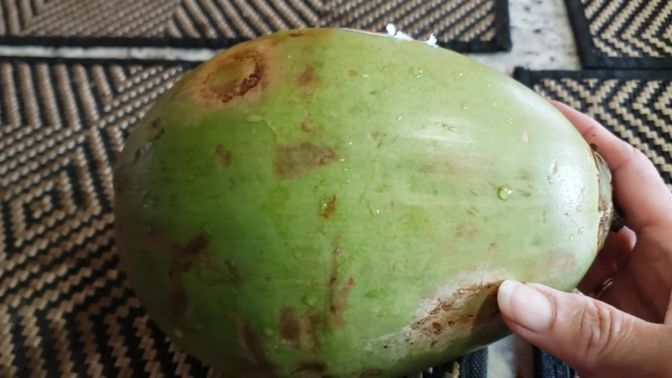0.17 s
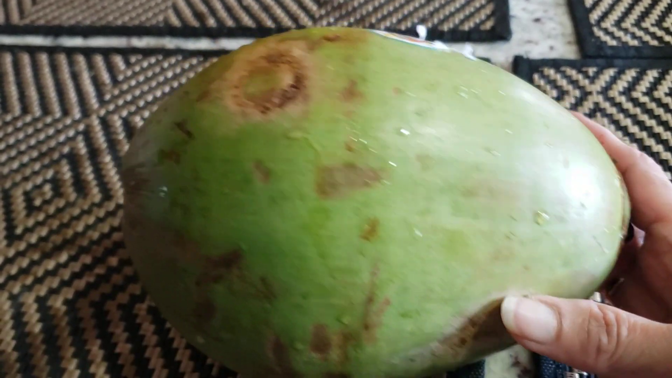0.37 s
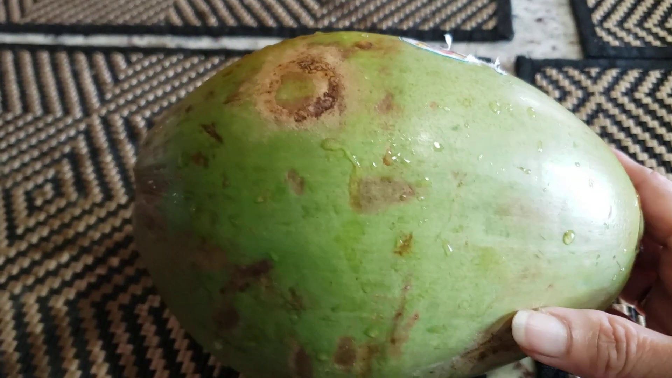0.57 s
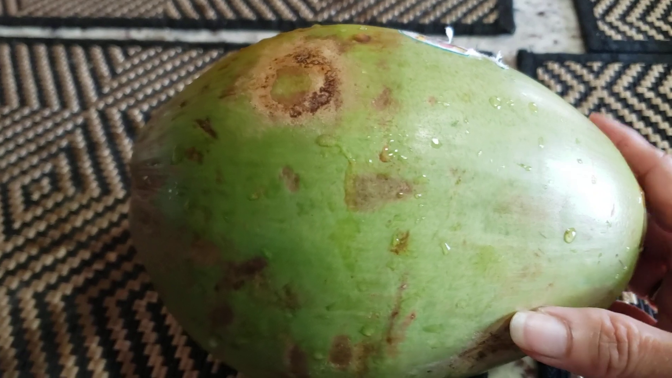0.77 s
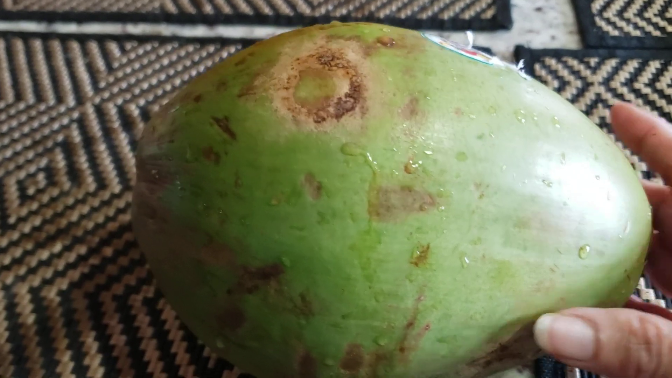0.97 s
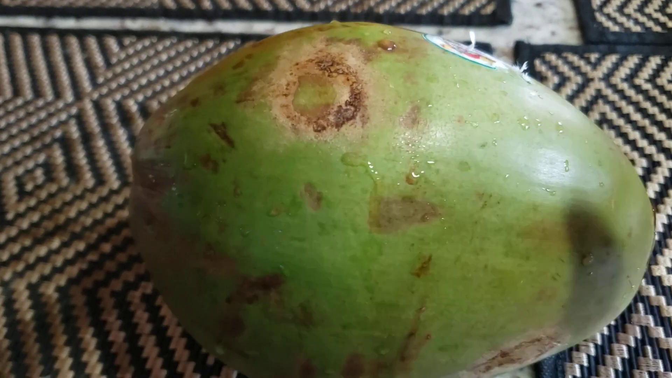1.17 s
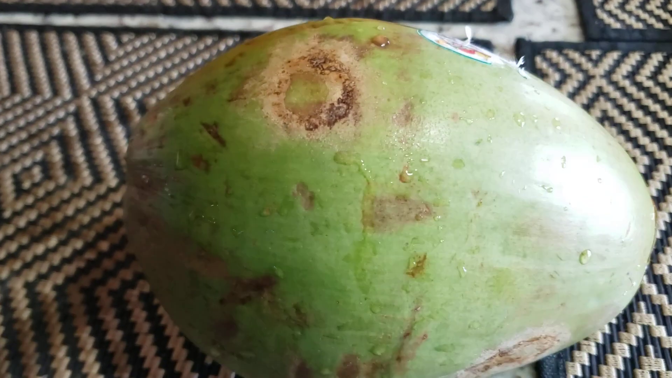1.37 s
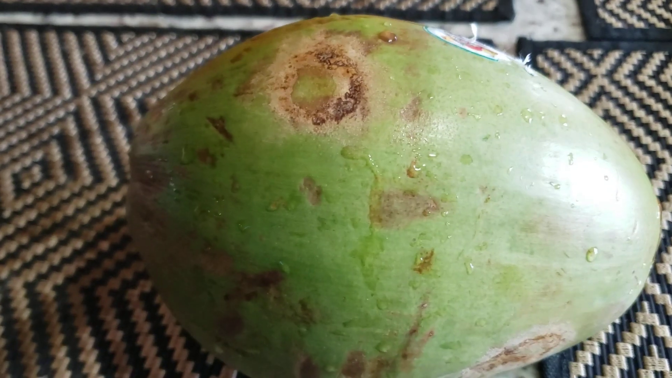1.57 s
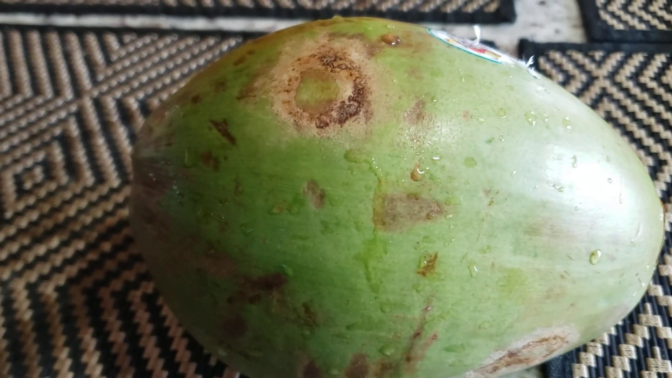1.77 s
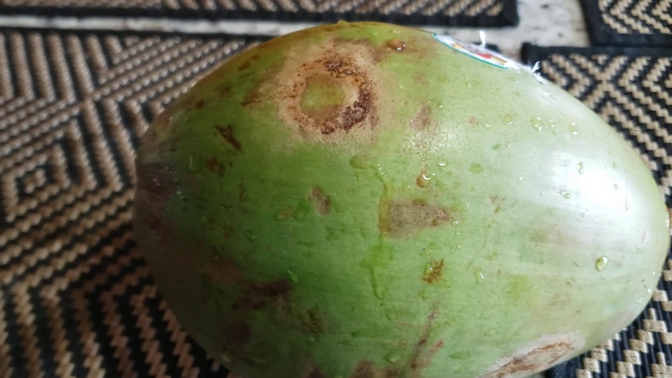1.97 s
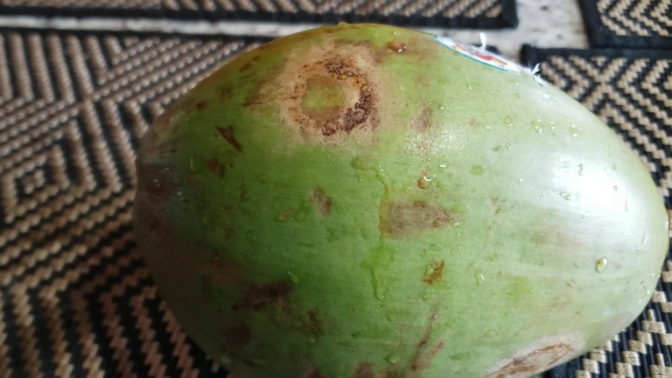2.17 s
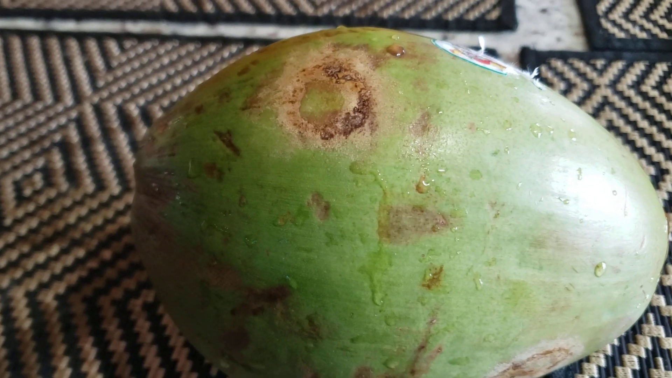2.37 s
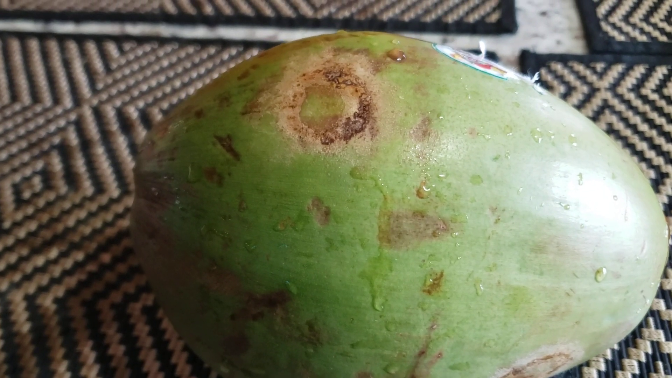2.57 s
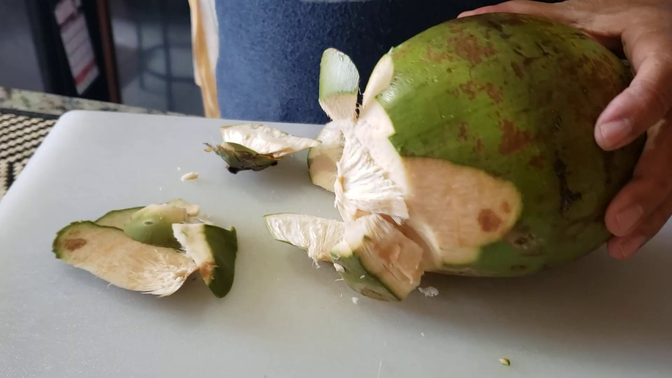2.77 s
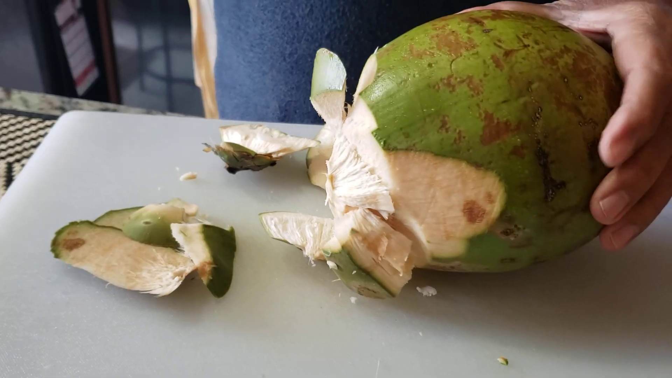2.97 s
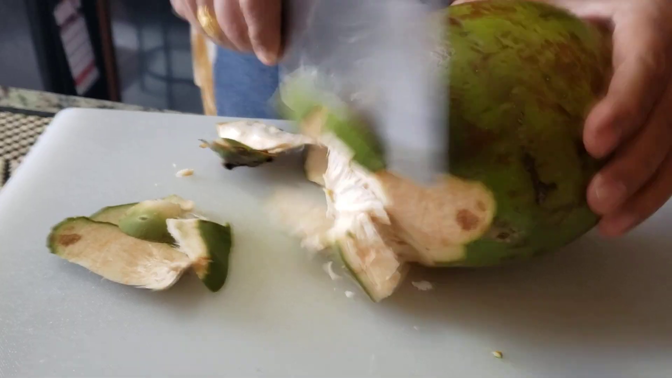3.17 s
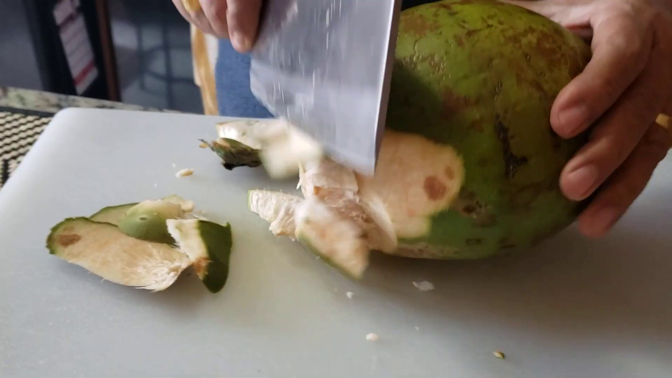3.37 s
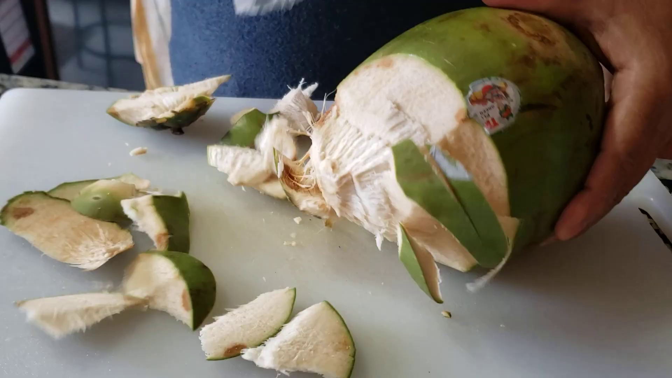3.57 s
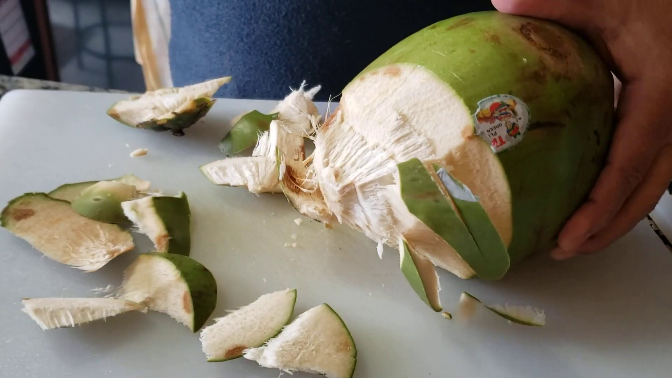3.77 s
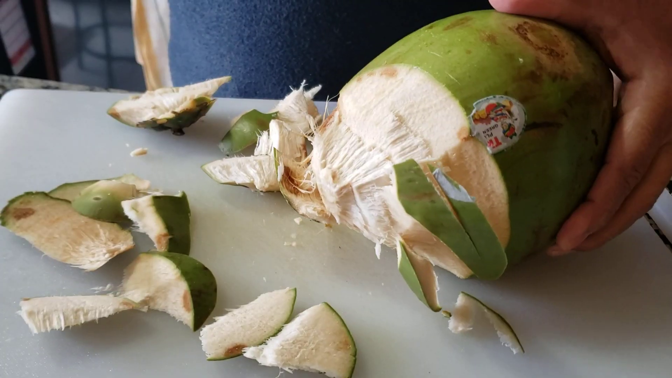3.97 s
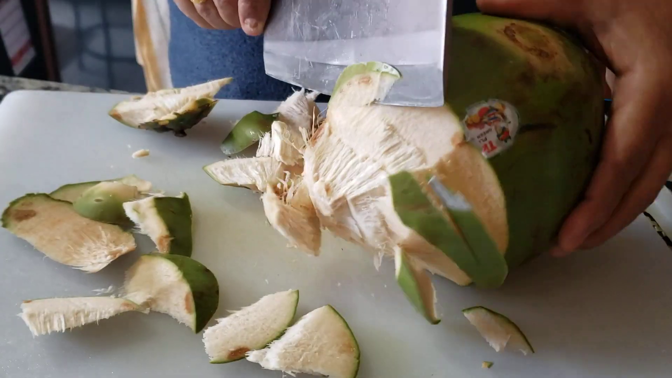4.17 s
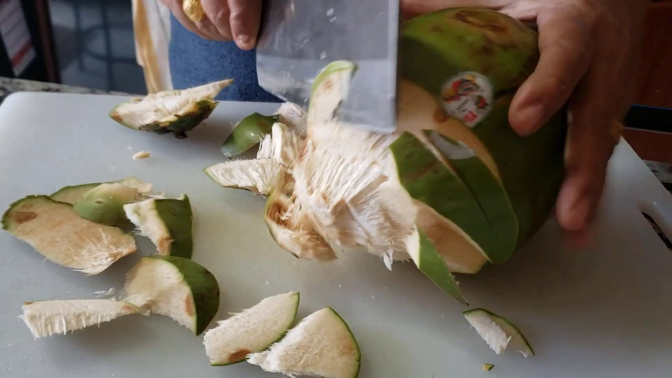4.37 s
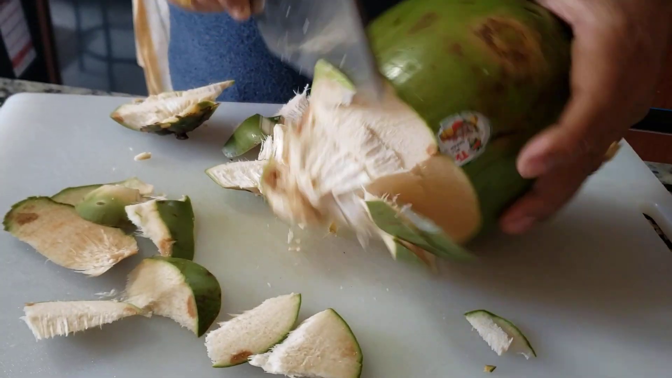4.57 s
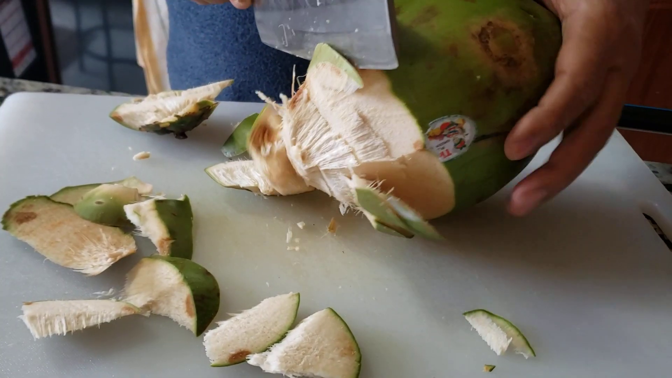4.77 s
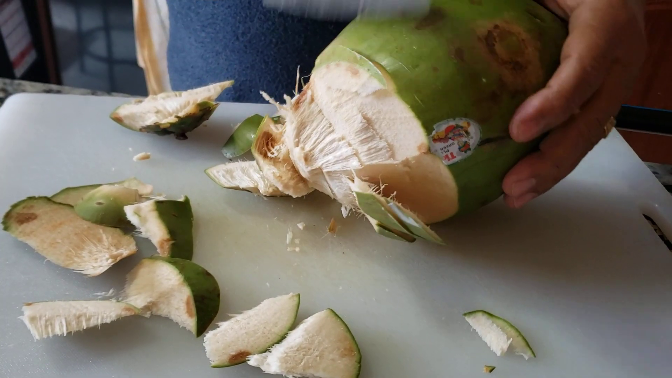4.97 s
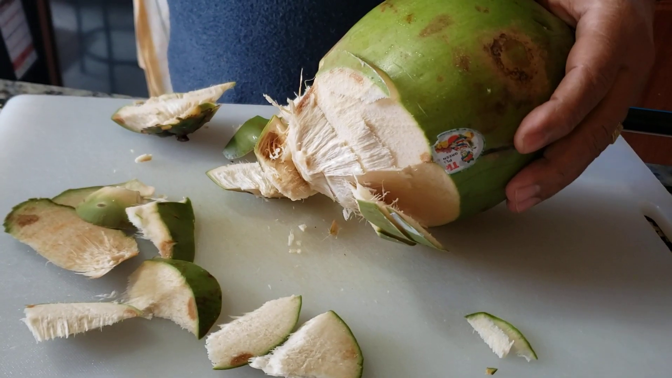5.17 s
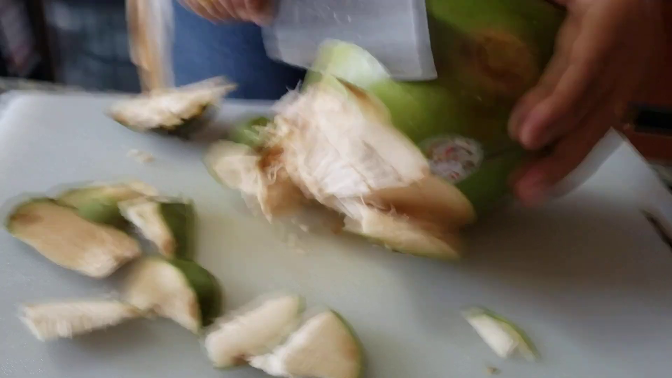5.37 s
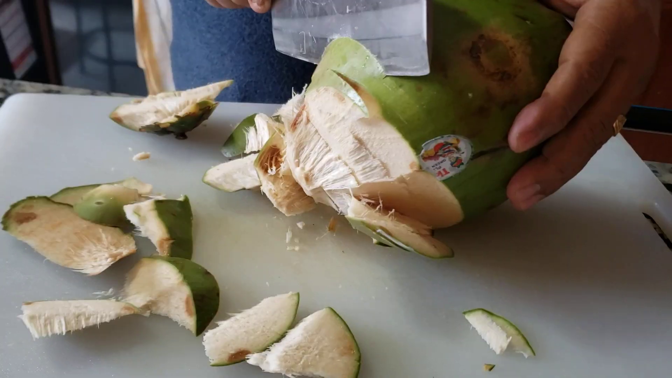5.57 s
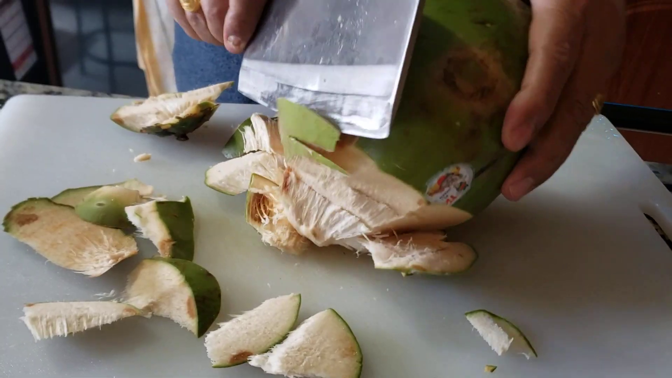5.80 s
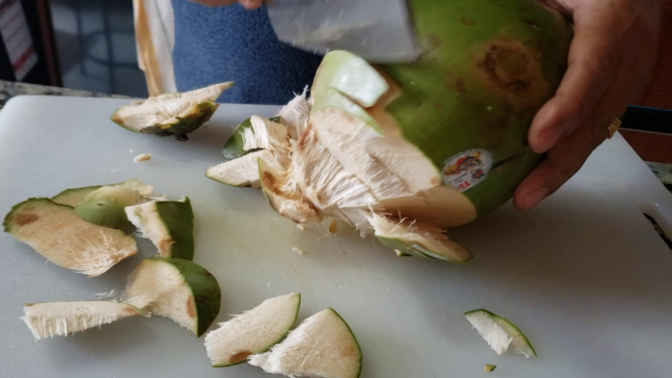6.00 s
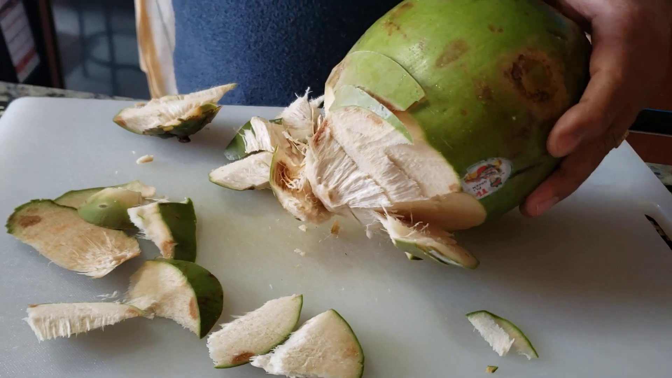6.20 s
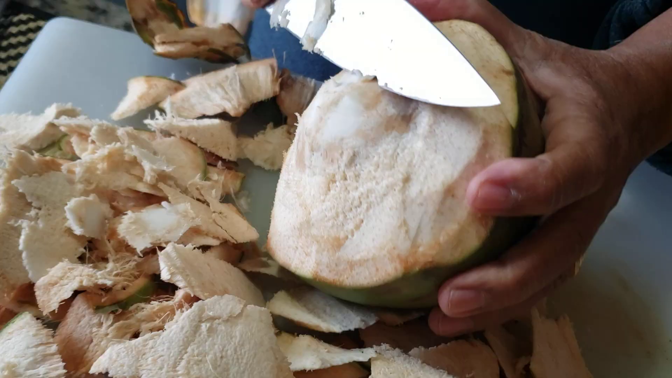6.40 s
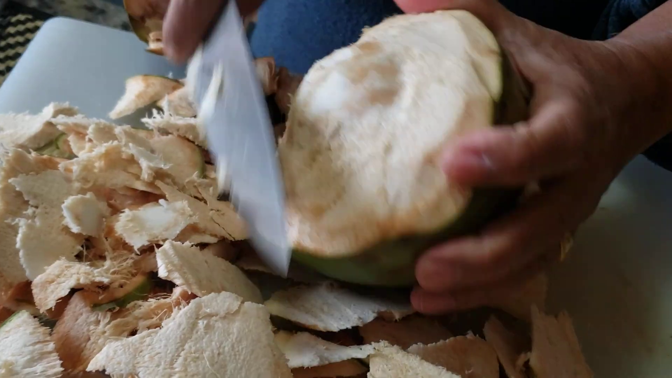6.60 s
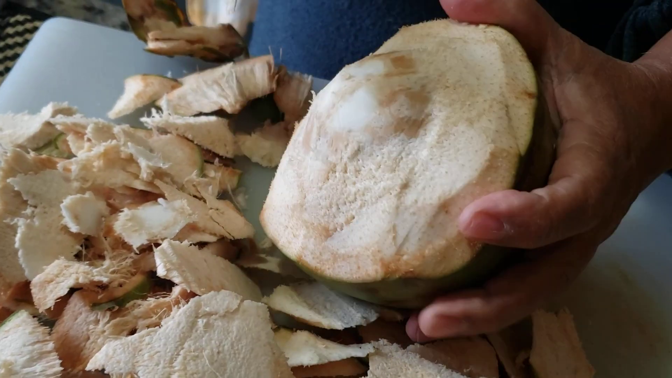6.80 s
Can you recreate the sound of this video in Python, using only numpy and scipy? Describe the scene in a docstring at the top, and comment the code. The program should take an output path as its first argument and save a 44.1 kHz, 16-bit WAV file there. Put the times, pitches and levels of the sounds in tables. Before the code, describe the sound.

Over an appliance's steady rush and faint whine, three cleaver blows crack into coconut husk, the blade scraping and tearing fibres in between.

```python
"""An appliance rushes, hums and whines in a small kitchen, heard first from near it, then beside a board.
There a cleaver chops three times into the husk of a green coconut: splitting fibres crack, blade and
nut ring, and the force passes through the plastic board to boom in the counter.
Between blows the blade rasps as it is worked free, husk tears and wet fingers tick off the skin."""
import sys
import numpy as np
from scipy import signal
from scipy.io import wavfile
from scipy.ndimage import uniform_filter1d

SR = 44100
rng = np.random.default_rng(int(sys.argv[2]) if len(sys.argv) > 2 else 0)


def int16_out(signal):
    """Quantize to a 16-bit WAV file."""
    q = np.round(np.clip(np.atleast_2d(signal).T, -1, 1) * 32767)
    wavfile.write(sys.argv[1], SR, q.astype(np.int16))


N = 301644


def amp(db):
    """Amplitude ratio of a level in dB."""
    return 10 ** (np.asarray(db) / 20)

def unit_rms(x):
    """Normalisation to a mean power of 1."""
    return x / np.sqrt(np.mean(x ** 2) + 1e-20)

def curve_at(points, hz):
    """Interpolation on a log-frequency axis."""
    freqs, values = np.transpose(points)
    return np.interp(np.log(hz + 1), np.log(freqs + 1), values)

def add(mix, start_s, sound):
    """Superposition of a sound on the mix."""
    part = mix[..., round(start_s * SR):][..., :sound.shape[-1]]
    part += sound[..., :part.shape[-1]]

def coloured(x, spectrum):
    """Minimum-phase filtering by (Hz, dB) points, with an impulse response of unit energy."""
    hz = abs(np.fft.fftfreq(4096, 1 / SR))
    log_gain = np.log(amp(np.maximum(curve_at(spectrum, hz), -100)))
    taps = np.fft.ifft(np.exp(np.conj(signal.hilbert(log_gain)))).real[:2048]
    return signal.oaconvolve(x, taps / np.linalg.norm(taps))[:len(x)]

def crackle(count, spread_db):
    """Heavy-tailed noise: samples of widely differing size are heard as crackle."""
    return unit_rms(rng.standard_normal(count) * amp(spread_db * np.minimum(rng.exponential(1, count), 5)))

def flutter(depth_db, span):
    """Random amplitude modulation, smoothed over a span of samples."""
    return amp(depth_db * unit_rms(uniform_filter1d(rng.standard_normal(N), span)))

def ring(hz, db, t60, t):
    """A damped oscillator, falling 60 dB in t60 seconds."""
    return amp(db - 60 * t / t60) * np.sin(2 * np.pi * hz * t)

def modal_sum(modes, t):
    """The impulse response of a body is the sum of its modes."""
    return sum(weight * ring(hz, db, t60, t) for hz, db, t60, weight in modes)


# Air noise near the appliance, at the board, and its hiss. Each row: frequency in Hz, density in dB.
NEAR_SPECTRUM = [(12, -55), (20, -36), (62, -0.5), (192, -4), (237, -3.5), (269, -6), (409, -4),
                 (505, -14.5), (597, -7), (649, -16), (871, -17), (1380, -15.5), (3000, -25), (3900, -66),
                 (6600, -120)]
BOARD_SPECTRUM = [(12, -70), (20, -41.5), (71, 5.5), (119, -18), (151, 0.5), (249, -3.5), (277, -12.5),
                  (309, -1), (438, -14.5), (593, -18), (661, -18), (858, -14.5), (1480, -21), (2710, -19.5),
                  (3600, -36.5), (4680, -117), (7920, -120)]
HISS_SPECTRUM = [(1760, -22), (3000, -28.5), (3290, -1), (4080, -1), (4840, 0), (5780, -6.5), (7270, -4.5),
                 (8090, -12), (9190, -32.5), (11800, -18), (15000, -21.5), (16000, -24.5), (16500, -37.5)]
# Balance at each position. Each row: frequency in Hz, left over right in dB.
NEAR_BALANCE = [(60, 2.0), (130, -1), (290, 0.5), (640, -4), (1410, 1.0), (3100, 2.0), (6820, 0),
                (15000, -1)]
BOARD_BALANCE = [(60, 0.0), (130, -0.5), (290, -0.5), (640, -0.5), (1410, 2.5), (3100, 8.5), (6820, -5),
                 (15000, -1.0)]
# Likeness of the two channels. Each row: frequency in Hz, correlation coefficient.
AIR_COHERENCE = [(60, 0.9), (180, 0.96), (550, 0.71), (1650, -0.2), (4970, -0.039), (15000, 0.5)]

def appliance_air(at_board):
    """A partly coherent noise field: left and right share a fraction of each random spectrum."""
    frames, hz = N // 256 + 5, np.fft.rfftfreq(1024, 1 / SR)
    draws = rng.standard_normal((frames, 513, 5)).T
    left, independent = draws[0] + 1j * draws[1], draws[2] + 1j * draws[3]
    coherence = curve_at(AIR_COHERENCE, hz)[:, None]
    right = coherence * left + np.sqrt(1 - coherence ** 2) * independent
    patches_db = 0.39 * unit_rms(uniform_filter1d(uniform_filter1d(draws[4], 10, 0), 14, 1))
    field = np.array([left, right]) * amp(patches_db)

    def air(spectrum, balance, db):
        gain = amp(curve_at(spectrum, hz) + np.outer([.5, -.5], curve_at(balance, hz)))
        noise = signal.istft(field * gain[..., None], nperseg=1024, noverlap=768)[1]
        return amp(db) * unit_rms(noise[:, :N])

    near = air(NEAR_SPECTRUM, NEAR_BALANCE, db=-45.5) + air(HISS_SPECTRUM, NEAR_BALANCE, db=-68)
    board = air(BOARD_SPECTRUM, BOARD_BALANCE, db=-47.5) + air(HISS_SPECTRUM, BOARD_BALANCE, db=-70.5)
    return (1 - at_board) * near + at_board * board


# Resonances of the motor housing. Each row: frequency in Hz, bandwidth in Hz, level in dB.
HOUSING_BANDS = [(234.3, 3.5, -53.5), (386, 10, -66), (983.3, 11.5, -65), (1386, 9.9, -70)]

def housing_hum():
    """Resonance: the housing turns broadband noise into narrow, fuzzy bands."""
    noise = rng.standard_normal(N)
    return sum(amp(db) * unit_rms(signal.lfilter(*signal.iirpeak(hz, hz / width, SR), noise))
               for hz, width, db in HOUSING_BANDS)


def whine(at_board, hz=600.4, near_db=-51, board_db=-60.5, swell_db=5, swell_s=1.63):
    """An amplitude-modulated pure tone, which swells as the microphone settles."""
    t = np.arange(N) / SR
    swelling_db = near_db - swell_db * np.maximum(1 - t / swell_s, 0)
    level = amp((1 - at_board) * swelling_db + at_board * board_db)
    tone = np.sqrt(2) * np.sin(2 * np.pi * hz * t) * flutter(depth_db=0.63, span=2500)
    return level * tone * amp([[-3], [3]])  # louder on the right


# Decay of the kitchen. Each row: frequency in Hz, reverberation time in seconds.
ROOM_T60 = [(200, 0.36), (1000, 0.35), (3000, 0.32), (8000, 0.29), (15000, 0.19)]
# Colour of the echoes. Each row: frequency in Hz, relative gain in dB.
WALL_COLOUR = [(300, 0), (1000, -4), (3000, 0), (6500, -4), (10000, 0), (15000, 4)]

def reverberation(x, patterns=4, mono_hz=600):
    """Sparse reflections decay band by band; echo patterns alternate rapidly, giving a smooth tail."""
    reflected = coloured(x, WALL_COLOUR)
    turn = np.arange(N) / 40 % patterns
    slots = np.arange(160, SR // 2 - 20, 20)  # one reflection in every 20 samples
    echoes = np.zeros((2, N))
    for k in range(patterns):
        taps = np.zeros((2, SR // 2))
        arrivals = slots + rng.integers(0, 20, (2, len(slots)))
        np.put_along_axis(taps, arrivals, rng.choice([-1., 1.], arrivals.shape), 1)
        hz, t, spectra = signal.stft(taps, SR, nperseg=256)
        decay = amp(-60 * t / curve_at(ROOM_T60, hz)[:, None])
        tail = signal.istft(spectra * decay, SR, nperseg=256)[1]
        off_turn = abs((turn - k + patterns / 2) % patterns - patterns / 2)
        share = reflected * np.cos(np.pi / 2 * np.minimum(off_turn, 1))
        echoes += signal.fftconvolve(share[None], tail / np.linalg.norm(tail[0]), axes=1)[:, :N]
    side = (echoes[0] - echoes[1]) / 2
    low_side = signal.filtfilt(*signal.butter(1, mono_hz, fs=SR), side)
    return echoes - np.outer([1, -1], low_side)  # long waves reach both ports alike


# Shading of sound from the board. Each row: frequency in Hz, left over right in dB.
PORT_SHADING = [(100, -0.1), (300, 4), (600, 6), (1400, 11.5), (3100, 23), (6800, -2.5), (11000, 8.5),
                (15000, 14)]

def direct_sound(x, lag_samples=9):
    """Acoustic shadow and path difference: the microphone ports differ in colour, and the left lags."""
    left, right = (coloured(x, [(hz, side * db / 2) for hz, db in PORT_SHADING]) for side in (1, -1))
    return np.array([np.roll(left, lag_samples), right])


# Spectra of the worked husk. Each row: frequency in Hz, relative density in dB.
RASP_SPECTRUM = [(880, -40), (1500, -21), (1740, -9), (1920, -14), (2210, -6), (2840, 1), (3470, -12.5),
                 (7000, -32), (9100, -28), (15400, -120)]  # blade dragging in husk
FIZZ_SPECTRUM = [(2350, -10.5), (4000, -2.5), (5070, 2), (7370, 3.5), (10400, -9), (11900, 3), (15200, -3),
                 (16200, -12), (16500, -76)]  # wet fibres parting
DRAG_SPECTRUM = [(240, -38), (400, -5), (466, -37), (974, 0), (1100, -8), (1810, -7), (2500, -15.5),
                 (3250, -36.5), (5500, -120)]  # the nut sounding under the blade
# Blade strokes. Each row: start of the hold, rise, hold and fall in seconds, rasp, fizz and drag in dB.
BLADE_STROKES = [(3.49, .02, .01, .06, -64, -67, -70), (3.565, .05, .01, 0.12, -63.5, -64.5, -60),
                 (4.319, 0.033, .06, 0.21, -59, -58, -60), (4.656, 0.074, 0.012, 0.084, -48.5, -58, -49),
                 (4.86, 0.081, .01, .05, -59, -62.5, -61), (5.03, .03, .01, .08, -65, -69, -61),
                 (5.758, 0.022, 0.072, 0.056, -41.5, -45.5, -52),
                 (5.795, .02, .012, 0.035, -40, -39.5, -52), (5.958, .06, .01, .05, -63, -70, -62),
                 (6.04, 0.045, 0.1, .03, -68, -67, -68), (6.37, .04, .01, .08, -64.5, -76, -65),
                 (6.83, 0.066, .02, 0.057, -50.5, -52, -60)]

def blade_friction(swing_db=20):
    """Friction in the husk makes clumps of crackle; a stroke gains swing_db over its rise, then fades."""
    t = np.arange(N) / SR
    start, rise, hold, fall, *levels_db = np.transpose(BLADE_STROKES)[:, :, None]
    off_peak = np.maximum((start - t) / rise, 0) + np.maximum((t - start - hold) / fall, 0)
    envelopes = amp(-swing_db * off_peak)
    clumps = flutter(depth_db=2.5, span=150)
    layers = zip(levels_db, (RASP_SPECTRUM, FIZZ_SPECTRUM, DRAG_SPECTRUM), (3.4, 2.2, 4.7))
    return sum((amp(db) * envelopes).sum(0) * unit_rms(coloured(crackle(N, spread_db) * clumps, spectrum))
               for db, spectrum, spread_db in layers)


# Fibre and fingertip snaps. Each row: start in seconds, level in dB, ring in Hz, relative rasp in dB.
SMALL_SNAPS = [(0.5944, -47.5, 5350, -9), (0.984, -59, 5480, -3), (0.9915, -58, 7400, 2),
               (1.024, -43.5, 5200, -8), (1.0403, -45, 6900, -14), (1.0885, -38, 6200, -14),
               (3.5697, -55, 7300, -5), (4.323, -41, 7240, -8), (4.3283, -47, 5996, -13),
               (4.8657, -53, 8290, -3), (5.0273, -55, 8100, -2), (5.7567, -37, 5200, -9),
               (5.7786, -32, 5310, -14), (5.793, -21.5, 7500, -5), (5.8049, -41, 5110, -10),
               (5.821, -23.5, 7500, -11), (5.8457, -36, 7170, -2), (6.1308, -49, 7330, -6.5),
               (6.8252, -50, 7400, -11)]

def snaps(decay_s=0.0008):
    """Impulsive excitation: a sudden release gives a burst of fizz and rasp and a very short ring."""
    out, t = np.zeros(N), np.arange(400) / SR
    for start, db, hz, rasp_db in SMALL_SNAPS:
        burst = rng.standard_normal(len(t)) * np.exp(-t / decay_s)
        fizz = .8 * coloured(np.diff(burst, prepend=0), FIZZ_SPECTRUM)
        rasp = amp(rasp_db) * coloured(burst, RASP_SPECTRUM)
        add(out, start, amp(db) * (fizz + rasp + ring(hz, db=-1, t60=.005, t=t)))
    return out


# Low modes. Each row: frequency in Hz, level in dB, 60 dB decay time in seconds, signed weight.
COUNTER_MODES = [(35.1, .4, .39, -1), (44.3, 3.1, .15, 1), (55.1, .4, .37, 1), (76.6, -4.1, .38, -1),
                 (88.6, .3, .28, 1), (114.1, 12.9, .05, -1), (140.6, 1.8, .22, 1), (165.9, -11.9, .32, -1),
                 (194.8, -6.9, .19, 1), (206.7, -15.7, .4, 1), (259, -3.9, .24, 1), (267.1, -4, .14, 1),
                 (334.5, -12.5, .2, -1), (341.9, -11.2, .26, 1), (419.8, -19.6, .24, 1)]  # counter and board
STAND_MODES = [(54.3, -3.5, 0.28, -0.78), (78, -10.5, .25, 1)]  # the microphone stand rocking sideways, left against right

def counter_boom(force, stand_delay_s=0.011, settle_s=.14, damping_db_per_s=250):
    """Forced vibration of the counter: a longer contact drives fewer high modes."""
    t = np.arange(SR // 2) / SR
    counter = modal_sum(COUNTER_MODES, t)
    rocking = modal_sum(STAND_MODES, np.maximum(t - stand_delay_s, 0))
    damping = amp(-damping_db_per_s * np.maximum(t - settle_s, 0))  # the board lies flat again
    response = np.array([counter + rocking, counter - rocking]) * damping
    return signal.fftconvolve(response, force[None] / force.sum(), axes=1)


# Modes of the nut. Each row: frequency in Hz, level in dB, 60 dB decay time in seconds, polarity.
NUT_MODES = [(350, -3, .035, -1), (790, -0.5, .034, 1), (1060, 1.5, .038, 1), (1240, -4, .04, -1),
             (1600, -14, .03, -1), (2400, -3, .03, 1)]
# The blade, damped by husk. Each row: frequency in Hz, level in dB, 60 dB decay time in seconds.
BLADE_MODES = [(1473, -5.5, 0.14), (1973, -7.5, 0.076), (2727, 1, 0.064), (2893, -4, 0.098),
               (3330, -6.5, .12), (5960, -13, .08), (7340, -10, .08)]
# Splitting fibres. Each row: frequency in Hz, relative density in dB.
CRACK_SPECTRUM = [(200, -35.5), (340, -8.5), (560, -22.5), (1040, -3), (1700, -5), (2500, -1.5), (3500, -4),
                  (4700, -8.5), (6000, -6.5), (7300, -5.5), (9000, -18), (12000, -15), (15500, -15.5),
                  (16500, -31)]
# Cleaver blows. Each row: start in seconds, gains of crack, boom and knock in dB, contact and cutting
# times in ms, crack tilt in dB per octave, gain of the blade ring in dB, bite time in ms.
BLOWS = [(4.1206, -8.5, -19.5, -9, 1, 4.07, 1.5, -25, 1.45),
         (5.4507, -10.5, -17.5, -17.5, 4.34, 5.96, -0.5, -19, 0.84),
         (6.5697, -9, -19.5, -18, 4.5, 6.03, 0, -20.5, 2.3)]

def chops():
    """Fracture and impact: splitting fibres excite blade and nut, while the push drives the counter."""
    strikes, booms = np.zeros(N), np.zeros((2, N))
    t = np.arange(8000) / SR
    ms = t[:4000] * 1000
    nut = modal_sum(NUT_MODES, t[:4000])
    blade = sum(ring(*mode, t) for mode in BLADE_MODES)
    for start, crack_db, boom_db, knock_db, contact_ms, cut_ms, tilt_db, blade_db, bite_ms in BLOWS:
        envelope = (1 - np.exp(-(ms / bite_ms) ** 2)) / (1 + (ms / cut_ms) ** 3.6)
        cutting = crackle(len(ms), spread_db=3.2) * envelope
        spectrum = [(hz, db + tilt_db * np.log2(hz / 3000)) for hz, db in CRACK_SPECTRUM]
        add(strikes, start, amp(crack_db) * coloured(cutting, spectrum))
        jolts = 0.081 * cutting - 0.96 * (ms == 0)  # the blade's entry, then smaller jolts of cutting
        add(strikes, start, amp(knock_db) * signal.fftconvolve(jolts / np.linalg.norm(jolts), nut))
        add(strikes, start, amp(blade_db) * signal.fftconvolve(cutting / np.linalg.norm(cutting), blade))
        push = np.sin(np.pi * np.minimum(ms / contact_ms, 1) ** 2)  # force builds, then lets go
        add(booms, start, amp(boom_db) * counter_boom(push))
    return strikes, booms


def scene(move_s=3.49):
    """Superposition of background, echoes and direct sound; at move_s the microphone goes to the board."""
    strikes, booms = chops()
    nudge = np.hanning(round(0.0065 * SR))  # one soft push on the counter
    add(booms, start_s=1.372, sound=amp(-43) * counter_boom(nudge))
    handling = blade_friction() + snaps()
    echoes = reverberation(amp(-3.5) * strikes + amp(-9.5) * handling)
    at_board = np.clip((np.arange(N) / SR - move_s) / 0.014, 0, 1)
    background = appliance_air(at_board) + (1 - at_board) * housing_hum() + whine(at_board)
    return background + echoes + booms + direct_sound(strikes + handling)


def record(dry):
    """Band limiting and saturation: the microphone sheds bass; a soft limiter rounds the loudest peaks."""
    low_hz, high_hz, ceiling = 37.4, 15900, 1.1
    thinned = signal.lfilter(*signal.butter(2, low_hz, "high", fs=SR), dry)
    rounded = ceiling * np.tanh(thinned / ceiling)
    lowpass = signal.firwin(255, high_hz, window=("kaiser", 9), fs=SR)
    return signal.oaconvolve(rounded, lowpass[None], "same")


dry = scene()
out = record(dry)
int16_out(out)
```